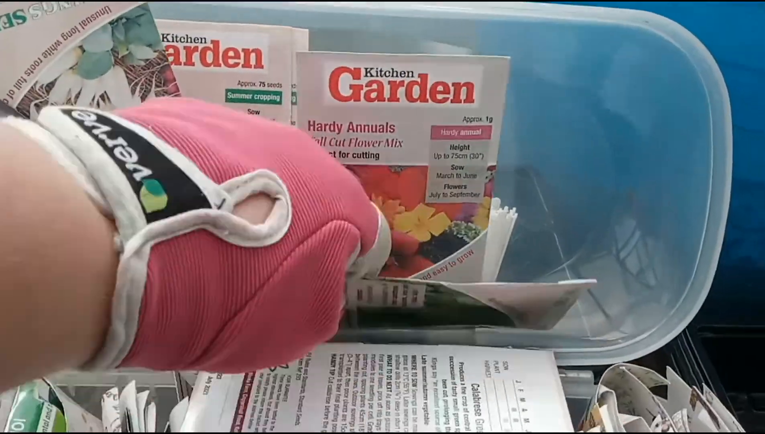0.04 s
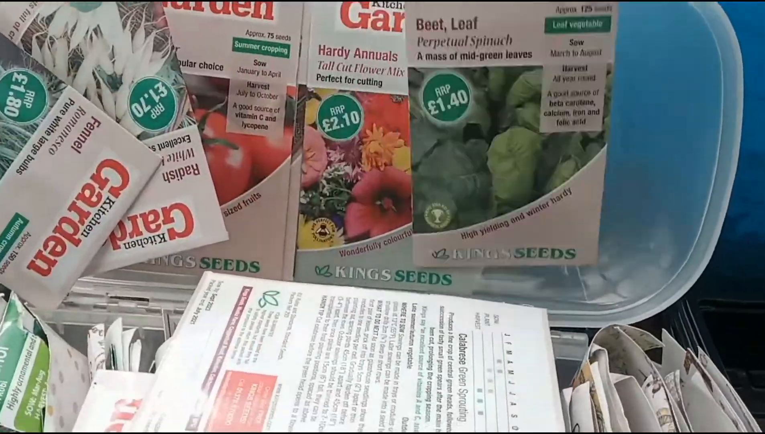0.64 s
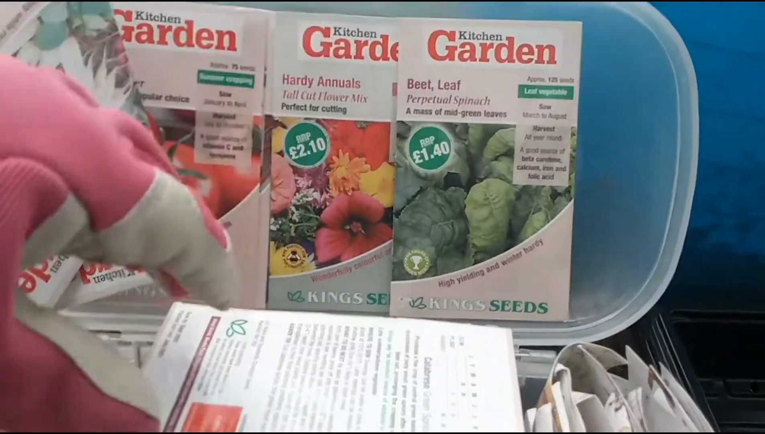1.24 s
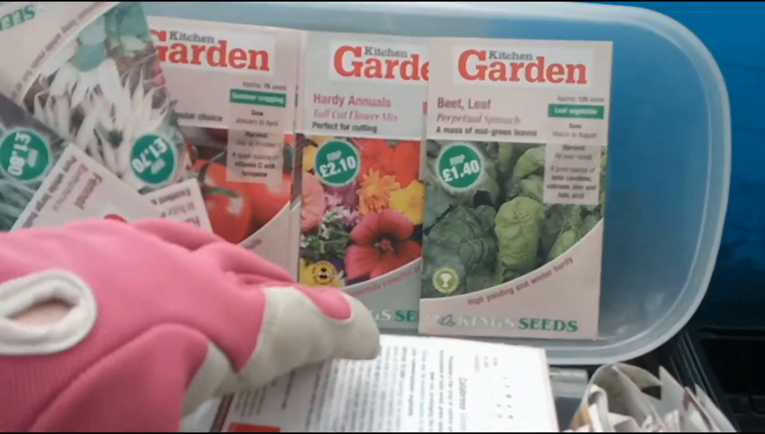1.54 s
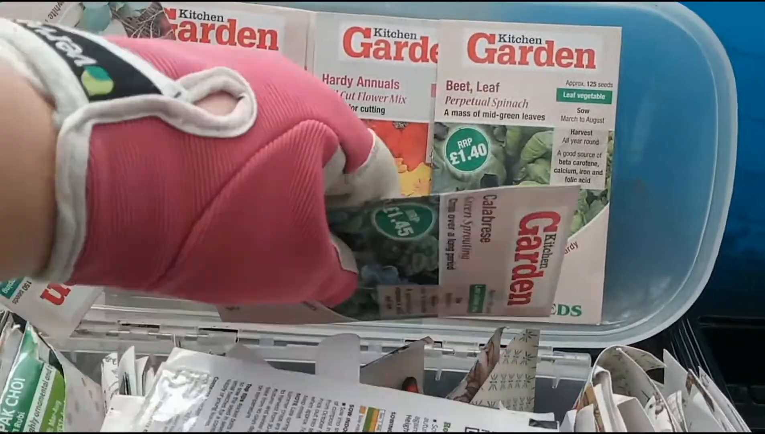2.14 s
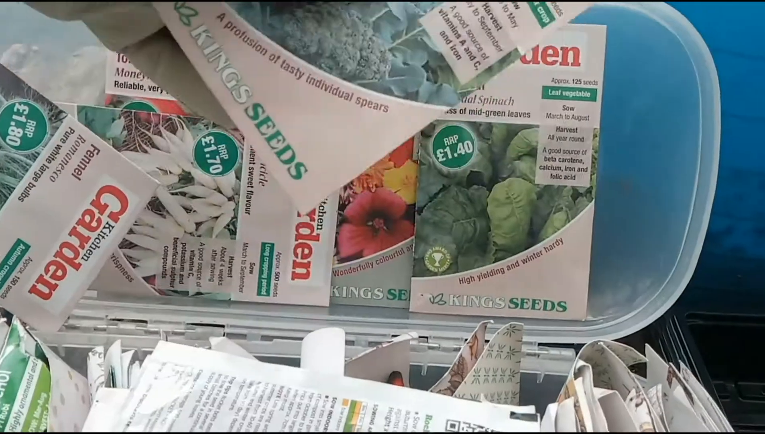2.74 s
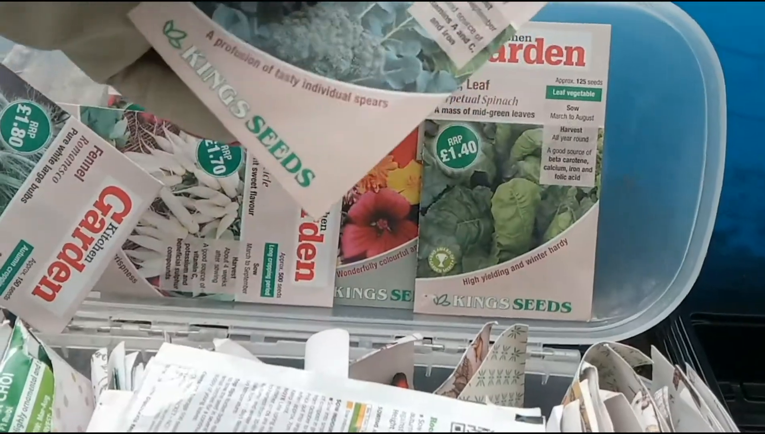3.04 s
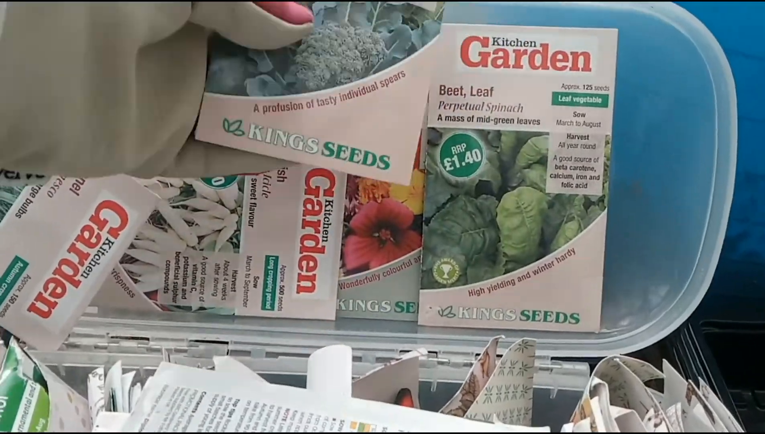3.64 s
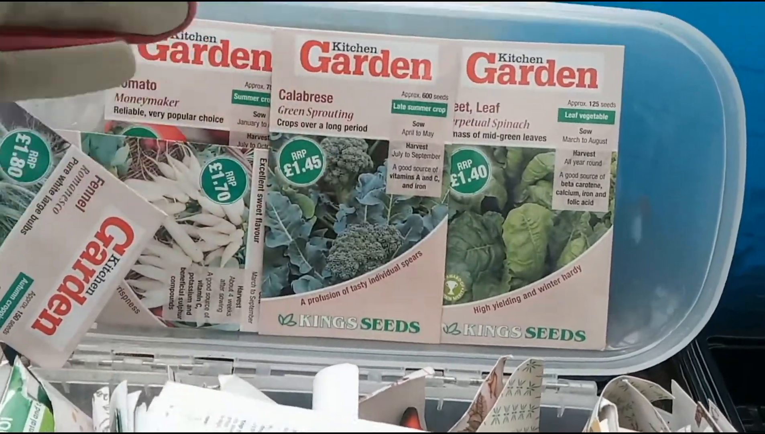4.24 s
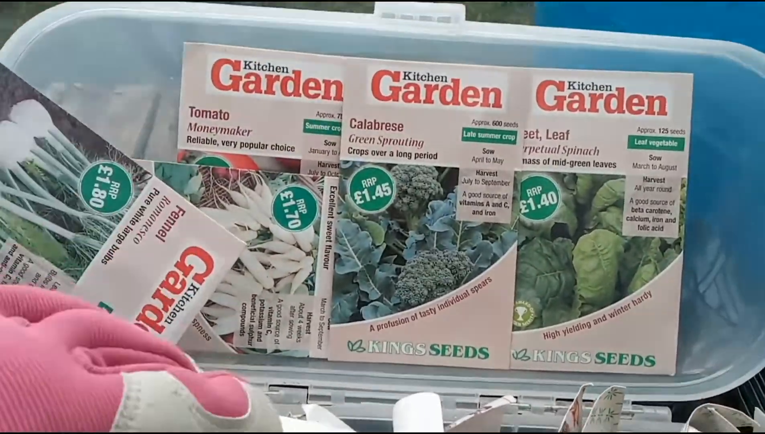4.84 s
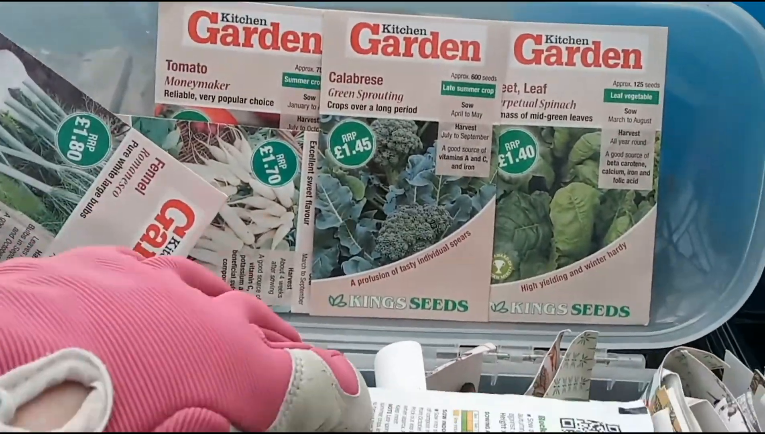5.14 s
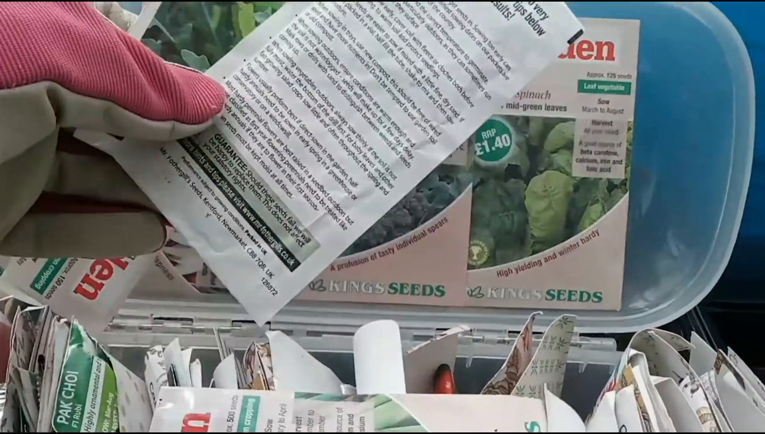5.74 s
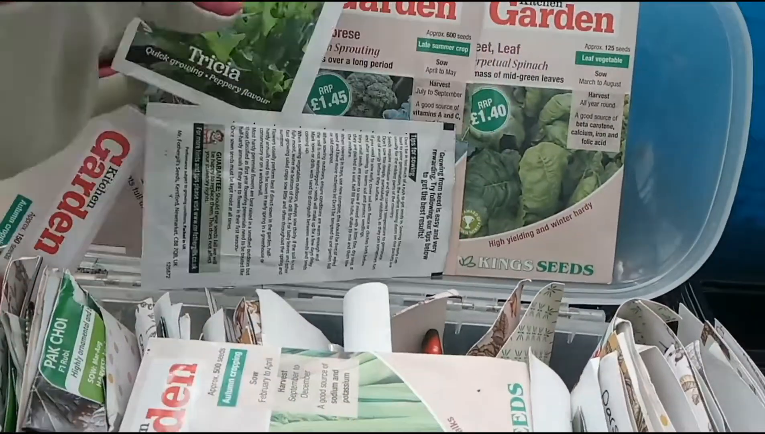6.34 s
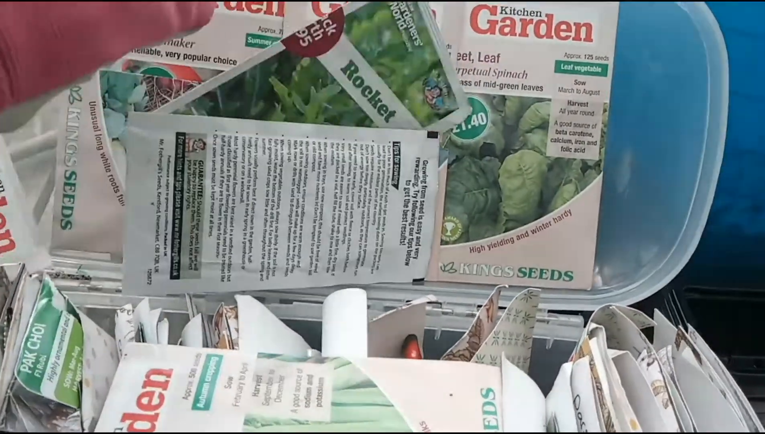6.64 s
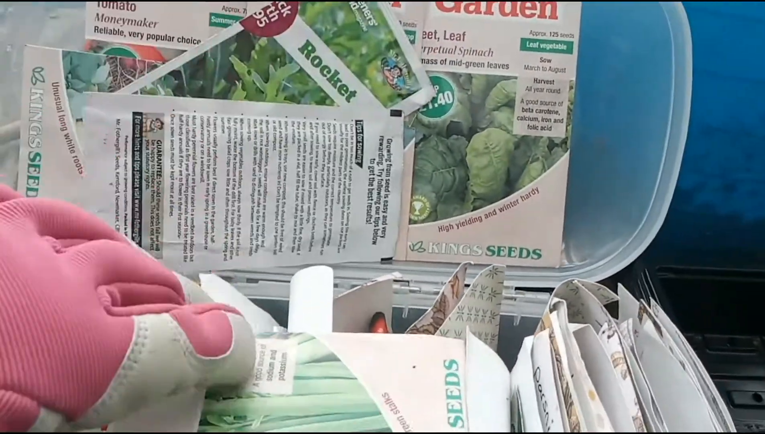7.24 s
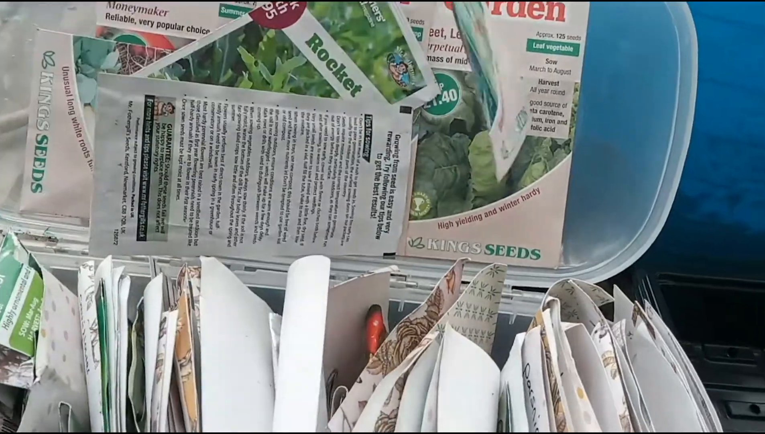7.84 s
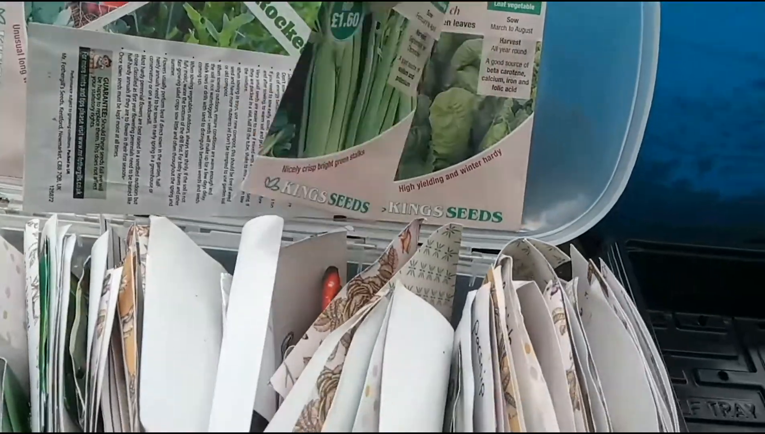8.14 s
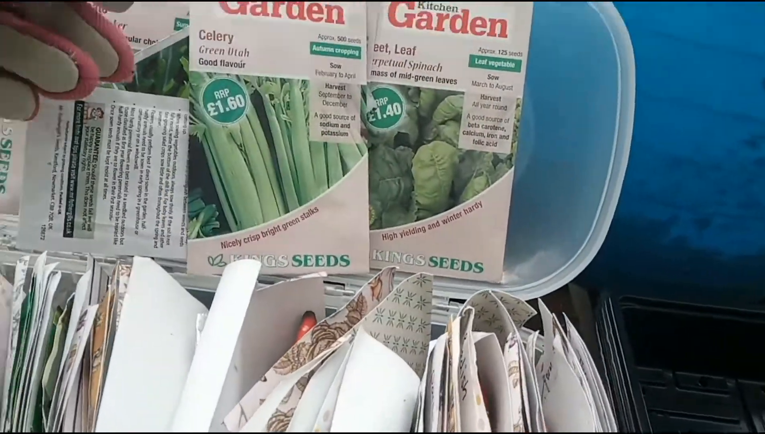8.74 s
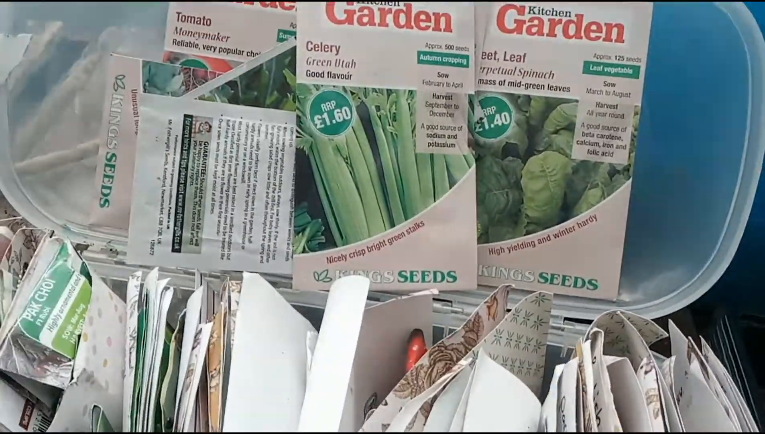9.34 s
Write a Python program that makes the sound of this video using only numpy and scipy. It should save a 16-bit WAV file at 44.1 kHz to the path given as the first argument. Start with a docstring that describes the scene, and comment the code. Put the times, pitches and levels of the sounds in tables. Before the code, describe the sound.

Close to the microphone, a gloved hand leafs through paper seed packets in a plastic box. Packets slide with a dry hiss, edges snap free and seeds rattle inside. Some drop onto the plastic lid with a hollow slap, hardest about four seconds in. A flurry of rustling follows, then mostly lighter drops and a few low bumps on the box before the handling dies away. Faint outdoor air rumbles underneath.

```python
"""Outdoors, close to the microphone, a gloved hand leafs through paper seed packets in a plastic box.
First packets slide from the stack with a friction hiss, edges snap free and seeds rattle inside; some
drop on the open lid and set it ringing, hardest at 4 s. Just after 5 s comes a flurry of rustling, then
a run of mostly lighter drops. From 7 s a few bumps make the box boom, and by 9.5 s the handling has
died away. Distant air rumbles below throughout."""
import sys
import numpy as np
from scipy import signal
from scipy.fft import rfft, irfft, next_fast_len
from scipy.io import wavfile
from scipy.ndimage import uniform_filter1d, map_coordinates

SR = 44100
rng = np.random.default_rng(int(sys.argv[2]) if len(sys.argv) > 2 else 0)


def master(y):
    """Save y as 16-bit WAV."""
    cut = np.clip(np.atleast_2d(y).T, -1, 1)
    pcm = np.round(cut * 32767)  # scale
    wavfile.write(sys.argv[1], SR, pcm.astype(np.int16))


N = 422478

# Spectra of crisp paper, a hollow packet and bending card. Each row: frequency in Hz, gain in dB.
PAPER_SPECTRUM = [(100, -45.5), (400, -8.5), (1000, -16), (2000, -9.5), (3200, -1), (6000, 2.5), (7500, 2),
                  (8700, -13), (11000, -11), (14300, -4.5), (16000, -15)]
POUCH_SPECTRUM = [(80, -38.5), (180, -13.5), (300, -3.5), (550, 5.5), (750, -4.5), (1100, 6), (1500, -1.5),
                  (2400, 12), (4000, -9), (9000, -61)]
CARD_SPECTRUM = [(60, -43.5), (150, -25.5), (260, -13), (600, -13), (1100, -8.5), (1600, 1), (2400, -6),
                 (3500, 0), (6000, -8), (9000, -30.5)]


def sliding():
    """Sliding friction: paper catches unevenly on paper; pressing brings out the packet's hollow."""
    # Each row: start, length and rise in seconds, relative friction level in dB, hollow offset in dB.
    strokes = [(0.0, 0.22, 0.0067, -70, -6), (0.356, 0.099, 0.028, -79.5, 5.5),
               (0.534, 0.27, 0.024, -87, -3.5), (1.763, 0.37, 0.057, -66.5, -10),
               (2.214, 0.54, 0.035, -78.5, -9.5), (3.402, 0.16, .06, -81, 3), (3.622, 0.65, 0.032, -76, 1),
               (3.95, 0.19, .01, -68, -16), (4.37, 0.086, .03, -82.5, 6.5), (5.059, 0.056, 0.038, -72, -10),
               (5.143, 0.12, .02, -68.5, -5.5), (5.273, 0.23, .02, -58, -10),
               (5.671, 0.23, 0.042, -67.5, -8.5), (6.195, 0.24, 0.036, -76, -8),
               (6.438, 0.11, .01, -62, -8), (6.918, 0.019, .01, -66, -14), (7.261, 0.24, 0.034, -81.5, -2),
               (7.405, 0.23, 0.037, -59, -15), (7.904, 0.034, 0.022, -64.5, -23),
               (8.262, 0.057, .04, -72.5, -9), (8.438, 0.13, .03, -80.5, -1.5),
               (8.832, 0.13, 0.13, -71, -12), (9.121, 0.064, .04, -82, -8.5)]
    t, friction, body = np.arange(N) / SR, np.zeros(N), np.zeros(N)
    for start, length, rise, db, hollow_db in strokes:
        age = t - start
        held = np.clip(age / rise, 0, 1) * amp(db)
        stroke = held * fade(np.maximum(age - length, 0), t60=0.34)  # coasts to rest
        friction += stroke
        body += amp(hollow_db) * stroke
    surface = friction * crinkles() * grains(PAPER_SPECTRUM, per_s=320, scatter_db=3.5, hiss=1.7)
    pouch = grains(POUCH_SPECTRUM, per_s=590, scatter_db=6, hiss=0.63)
    card = grains(CARD_SPECTRUM, per_s=580, scatter_db=3.5, hiss=3.6)
    scrape = amp(13) * surface + body * (5.65 * pouch + 6.1 * card)
    return patchy(scrape, depth_db=2.5) * amp(2.7 * wobble(55))


def crinkles(per_s=70, scatter_db=3):
    """Buckling: creases give way at random moments, each a short surge in the friction's gain."""
    t = np.arange(SR // 20) / SR
    surges = (rng.random(N) < per_s / SR) * amp(-16.5 + scatter_db * bounded_normal(N))
    return 1 + signal.fftconvolve(surges, fade(t, t60=0.025))[:N]


def rustles(bend_s=0.039):
    """Granular impact: a jerk throws seeds against paper, whose resonances shift as the packet bends."""
    # Each row: start in seconds, level in dB, rise and t60 in seconds, relative body level in dB,
    # left minus right in dB.
    jerks = [(0.025, -36, 0.018, 0.096, 0, 1), (0.436, -46, 0.0017, 0.071, 0, -1),
             (0.674, -49.5, 0.012, 0.12, 8, 0), (0.784, -43, 0.0017, 0.45, 10, 2),
             (0.84, -38.5, 0.011, 0.1, 27, -3), (1.685, -53.5, 0.0018, 0.093, 9, 0),
             (1.783, -48, 0.0045, 0.071, -7, -2), (1.812, -43.5, 0.0089, 0.11, -13, 0),
             (2.071, -36.5, 0.0069, 0.07, -68, 0), (2.166, -32, 0.0024, 0.16, 0.5, 1),
             (2.486, -40, 0.009, 0.27, -9, -5.5), (2.518, -34, 0.0022, 0.17, 3, 5.5),
             (2.605, -44.5, 0.0032, 0.13, -3.5, 2), (3.803, -37.5, 0.01, 0.37, -6, -0.5),
             (3.877, -41.5, 0.006, 0.059, 2.5, 6), (3.927, -35.5, 0.0091, 0.022, -21.5, 1),
             (3.967, -30.5, 0.014, 0.37, -4, -1.5), (4.148, -42, .006, 0.095, 1, 4),
             (5.243, -28, 0.0049, 0.084, -4, -2.5), (5.291, -33.5, 0.024, 0.1, 11, -4.5),
             (5.37, -33, 0.036, 0.056, 0, -0.5), (5.422, -27, 0.0042, 0.12, -0.5, -1.5),
             (5.438, -33, 0.0065, 0.19, 3, -2), (5.512, -25.5, 0.016, 0.1, 1, 3.5),
             (5.808, -44.5, 0.019, 0.097, 11, 0), (5.992, -55, 0.0031, 1, 7, -0.5),
             (6.391, -28.5, 0.02, 0.041, 2, -2), (6.432, -29, .002, 0.12, 1, 6.5),
             (6.586, -44, 0.017, 0.34, -14, 1), (6.734, -33, 0.0013, 0.28, -7, -3),
             (6.892, -46, 0.0045, 0.18, -22, -4), (7.014, -32, 0.0056, 0.28, -39, -2),
             (7.501, -42, 0.0023, 0.36, 20, 2), (7.798, -28, 0.0019, 0.25, -5, 1),
             (8.137, -33.5, 0.023, 0.12, 7, -1), (8.22, -38, 0.0014, 0.2, 8, -2),
             (8.325, -36.5, 0.0025, 0.19, 0.5, 0), (8.356, -39.5, 0.013, 0.12, 10, 2),
             (9.28, -59.5, 0.024, 0.077, -5.5, 7)]
    out, t = np.zeros((2, N)), np.arange(SR // 3) / SR
    surface = grains(PAPER_SPECTRUM, per_s=5000, scatter_db=2.5, hiss=1.1)
    pouch = grains(POUCH_SPECTRUM, per_s=1800, scatter_db=3, hiss=0.8)
    card = grains(CARD_SPECTRUM, per_s=1200, scatter_db=3, hiss=0.7)
    hollow = 1.24 * pouch + 2 * card
    crossfades = [np.maximum(1 - abs(t / bend_s - k), 0) for k in range(int(t[-1] / bend_s) + 2)]
    for start, db, rise, t60, body_db, pan_db in jerks:
        here = slice(round(start * SR), round(start * SR) + len(t))
        seeds = surface[:, here] + amp(body_db - 9.5) * hollow[:, here]
        seeds = np.pad(seeds, ((0, 0), (0, len(t) - seeds.shape[1])))
        shower = sum(weight * creased(seeds, depth_db=4.5, spacing_hz=196.3) for weight in crossfades)
        swell = np.minimum(t / rise, 1) * fade(np.maximum(t - rise, 0), t60)
        add(out, start, amp(db) * unit(shower) * swell, pan_db)
    return out


def landings():
    """Impact excitation: a packet slaps, thumps and settles as the lid rings; soft contact is duller."""
    # Each row: start in seconds, attack level in dB, contact cutoff in Hz, relative lid ring in dB,
    # packet pitch in Hz, thump over slap in dB, left minus right in dB.
    impacts = [(0.198, -34.5, 1340, 6, 610, -3, 1), (0.212, -36.5, 1090, -10, 450, -3, -3),
               (0.7843, -24.5, 980, -7, 575, 2, -2.5), (0.789, -28.5, 600, -13, 256, 0, -4),
               (0.811, -32.5, 1090, 16, 493, 7, -0.5), (0.917, -48.5, 1910, -9, 243, 10, -2),
               (2.5194, -26, 1600, -2, 950, 2.5, -2.5), (2.5450, -31, 1426, -3, 1016, 5, -4),
               (3.970, -16.5, 690, -8.5, 464, -1.5, -1), (3.9875, -19, 1107, -14, 1083, 1.5, 4),
               (3.995, -25.5, 1140, 1.5, 497, -16, -1), (4.014, -32, 900, -15, 483, -4, 2.5),
               (5.991, -43, 830, -2, 533, -1, -7), (6.012, -56, 830, -5, 523, -1, 9),
               (6.4301, -20, 4600, -10, 2260, 2, -1), (6.4312, -31.5, 1130, -3, 520, 1, -7),
               (6.452, -34, 1100, 10, 577, -1, 0), (6.604, -46, 1500, 11, 1340, 11, -3),
               (6.744, -34, 1720, -1.5, 237, -6, -4), (6.765, -41.5, 1860, -2, 985, 4, 7),
               (6.821, -44, 1480, 8, 1030, 2, -2), (6.838, -45, 1300, -4, 553, -11, 2),
               (6.896, -41, 770, 6, 427, 8, -3), (6.912, -42, 600, -5, 463, 2, -2),
               (7.018, -40.5, 690, -19, 740, -3, -10), (7.507, -42, 1010, 3, 364, 7, -2),
               (7.800, -42, 905, 17, 510, -7, -6), (7.812, -38, 930, 5, 700, 6, -2.5),
               (7.828, -36, 840, 12, 475, -3, -4), (7.846, -43.5, 815, 18, 310, -2, 5),
               (8.139, -43, 1800, -8, 1240, 20, 1), (8.232, -46.5, 800, -1, 246, 7, -3),
               (8.363, -50.5, 700, 4, 340, 14, -5), (8.489, -50.5, 810, 4, 260, -4, -5),
               (8.517, -45.5, 810, 9, 550, -2.5, -2), (8.564, -48.5, 806, 12, 262, -10, -5),
               (9.164, -54, 954, 5, 750, -4, 0), (9.188, -54, 960, 7, 764, 3, 6)]
    # Modes of the lid. Each row: frequency in Hz, relative level in dB, t60 in seconds.
    lid_modes = [(237.5, -1.5, 0.44), (284, 7, 0.18), (336, -3, 0.076), (477.2, 2.5, 0.11),
                 (522, 2.5, 0.23), (570, -0.5, 0.15), (688, 8, 0.1), (810, 4.5, 0.18), (980, -7, 0.069),
                 (1075, 6.5, 0.11), (1286, -3.5, 0.23), (1841, -18, .1), (2290, -6.5, .09), (2520, -5, .09)]
    # Flat paper striking plastic. Each row: frequency in Hz, gain in dB.
    slap_spectrum = [(60, -40.5), (150, -27.5), (260, -4), (480, 2), (750, -7), (1100, 2.5), (1500, -2),
                     (2200, 5.5), (3500, 1), (7000, -16.5), (16000, -20.5)]
    out, t = np.zeros((2, N)), np.arange(SR // 4) / SR
    click = impulse(slap_spectrum)
    slap = np.pad(click / np.linalg.norm(click), (0, len(t) - len(click)))
    slap += 0.5 * np.interp(t - 0.0018, t, slap, left=0)  # the far edge follows the near one
    radiation = signal.butter(3, 195, "highpass", fs=SR, output="sos")  # a small lid has no deep bass
    for start, db, cutoff_hz, ring_db, packet_hz, thump_db, pan_db in impacts:
        settling = amp(-14) * fade(t, t60=0.043) + amp(ring_db - 33) * fade(t, t60=0.17)
        clatter = settling * creased(noise(slap_spectrum, len(t)), depth_db=-1, spacing_hz=93)
        thump = np.sin(2 * np.pi * packet_hz * t) * fade(t, t60=0.035)
        lid = amp(ring_db - 40.5) * ring(lid_modes, t, scatter_db=1.5, detune=0.04, blur_hz=35)
        contact = slap + amp(thump_db) * thump / np.linalg.norm(thump) + clatter + lid
        softness = signal.butter(3, cutoff_hz, fs=SR)
        blow = signal.lfilter(*softness, signal.sosfilt(radiation, contact))
        attack_rms = np.sqrt(np.mean(blow[:, :SR // 100] ** 2))
        add(out, start, amp(db) * blow / attack_rms, pan_db)
    return out


def flicks():
    """Elastic release: a bent edge lets go with a short, bright snap at its own resonance."""
    # Each row: start in seconds, relative level in dB, edge pitch in Hz, left minus right in dB.
    releases = [(0.042, -41.5, 5400, -4), (0.785, -27.5, 3800, 0.5), (0.846, -46, 4180, 8),
                (0.8503, -41, 3500, 6), (0.882, -54, 3500, 6), (0.919, -60, 4000, 9), (1.791, -42, 4800, 1),
                (1.848, -43, 4000, -1), (1.957, -45, 7100, -13), (2.1667, -29.5, 5900, 4.5),
                (2.498, -42, 3350, -5), (2.61, -47, 5000, -3), (3.471, -60, 5000, 4),
                (3.825, -34.5, 5200, 1.5), (4.298, -60, 6500, -14), (4.411, -63, 6483, -7),
                (4.443, -63, 6400, -16), (5.2461, -37.5, 6200, -11), (5.3148, -30.5, 2600, 2),
                (5.423, -35, 6040, 2), (5.447, -31.5, 4500, 7), (5.481, -36, 5500, 9),
                (5.516, -32, 4970, -5), (5.524, -24.5, 3630, -5), (5.685, -43.5, 6500, -6),
                (5.934, -49, 4000, 4), (6.401, -34.5, 5200, 3), (6.4308, -24, 3000, 4),
                (6.7367, -33, 6200, -13), (6.742, -24.5, 6000, -1), (7.406, -57, 4970, -2),
                (7.506, -41, 7000, -14), (7.635, -46, 7000, -1), (7.8, -53, 5500, -10),
                (8.093, -53, 4950, -4), (8.141, -35, 3100, -4), (8.222, -52, 3520, 5),
                (9.278, -54, 6030, 0)]
    out, t = np.zeros((2, N)), np.arange(SR // 8) / SR
    envelope = onset(t, rise_s=0.0007) * fade(t, t60=0.015)
    for start, db, edge_hz, pan_db in releases:
        paper = creased(noise(PAPER_SPECTRUM, len(t)), depth_db=-4.5, spacing_hz=413)
        snap = unit(filtered(paper, lambda hz: amp(6 * peak(hz, edge_hz, half_width_hz=1700))))
        add(out, start, amp(db + 10.5) * snap * envelope, pan_db)
    return out


def bumps():
    """Beating modes: the glove nudges the box, whose wall rings low and unevenly."""
    # Each row: start in seconds, relative level in dB, rise of the push in seconds.
    nudges = [(7.018, -34, 0.0039), (7.034, -34.5, .002), (7.070, -38.5, .002), (7.321, -44.5, 0.034),
              (7.503, -54, 0.0036)]
    # Modes of the wall. Each row: frequency in Hz, relative level in dB, t60 in seconds.
    wall_modes = [(145, -7, 0.19), (290, 1.5, 0.52), (332, 4.5, 0.16), (359.3, 3, 0.18), (399, -17, .12),
                  (458, -3.5, 0.26), (589, -3, 0.22), (650, -11, 0.29), (706, -12, 0.16),
                  (810, -12.5, 0.11)]
    out, t = np.zeros((2, N)), np.arange(SR // 2) / SR
    for start, db, push_s in nudges:
        wall = ring(wall_modes, t, scatter_db=1, detune=0.005, blur_hz=0.3)
        chafe = amp(2 * wobble(110)[:len(t)])
        add(out, start, amp(db) * wall * chafe * onset(t, push_s), pan_db=-2)
    return out


def ticks():
    """Buckling: single creases give way with a dry tick while a packet is held or turned."""
    # Each row: start in seconds, relative level in dB, crease pitch in Hz.
    creases = [(0.1212, -50, 5500), (0.158, -47, 6000), (0.172, -36, 5500), (0.214, -35, 4930),
               (0.260, -52, 9000), (0.382, -48, 2500), (0.434, -38, 5000), (0.470, -44, 2500),
               (0.559, -50, 3000), (0.633, -55, 4000), (0.689, -64, 4000), (2.622, -40, 5000),
               (2.97, -35.5, 5900), (3.172, -45, 6000), (3.187, -42, 6000), (3.206, -41, 5960),
               (3.513, -45, 6000), (3.536, -43, 6000), (3.7027, -35, 4000), (3.786, -52, 6000),
               (5.59, -75, 9000), (5.649, -43, 8200), (5.995, -40, 7040), (8.893, -48, 6000),
               (8.917, -49, 6000)]
    out, t = np.zeros((2, N)), np.arange(SR // 16) / SR
    envelope = onset(t, rise_s=0.0014) * fade(t, t60=0.014)
    for start, db, crease_hz in creases:
        paper = noise(PAPER_SPECTRUM, len(t))
        crack = unit(filtered(paper, lambda hz: amp(9 * peak(hz, crease_hz, half_width_hz=1500))))
        add(out, start, amp(db) * crack * envelope, pan_db=-3)
    return out


def squeaks():
    """Stick-slip: a quick scrape excites one narrow resonance of a glossy edge."""
    # Each row: start in seconds, level in dB, resonance in Hz, t60 in seconds.
    scrapes = [(1.014, -58, 3780, 0.12), (5.481, -17.5, 5440, 0.0088), (8.458, -51.5, 5670, 0.028),
               (9.284, -41, 6050, 0.071)]
    out, t = np.zeros((2, N)), np.arange(SR // 8) / SR
    for start, db, edge_hz, t60 in scrapes:
        slips = rng.standard_normal((2, len(t)))
        squeak = unit(filtered(slips, lambda hz: peak(hz, edge_hz, half_width_hz=600)))
        add(out, start, amp(db) * squeak * fade(t, t60), pan_db=2)
    return out


def reflections(x):
    """Scattering: things too small to return bass give a brief tail that changes as the hand moves."""
    t, step = np.arange(SR // 4) / SR, SR // 12
    out = np.zeros((2, N + SR))
    for start in range(0, N, step):
        scatter = noise([(150, -18), (300, -10), (900, 0), (16000, 0)], len(t))
        tail = scatter * fade(t, t60=0.12) * (t > 0.002)
        echo = signal.fftconvolve(x[:, start:start + step], tail / np.linalg.norm(tail[0]), axes=1)
        out[:, start:start + echo.shape[1]] += echo
    return out[:, :N]


def distant_air():
    """Ambient noise: a deep rumble, a low rush and a wash drift separately over a faint even hiss."""
    # Each row: frequency in Hz, gain in dB.
    air_spectrum = [(25, -24), (40, -9), (55, -1), (130, -1), (190, -6), (240, -3), (350, -10), (650, -14),
                    (950, -13), (1400, -23), (2200, -34), (4000, -46), (8000, -58), (16000, -60)]
    # Each row: time in seconds, then relative levels of rumble, rush and wash in dB.
    band_levels = [(0.0, -73, -57, -56), (0.5, -64, -55, -57.5), (0.95, -62, -53.5, -60),
                   (1.5, -58.5, -60, -58), (2.05, -62, -59.5, -57.5), (2.83, -59.5, -62.5, -63.5),
                   (3.2, -62, -67.5, -59), (3.89, -63, -60, -65), (4.6, -64.5, -62.5, -61),
                   (5.25, -59.5, -61.5, -64), (5.8, -65.5, -59, -63), (6.4, -64.5, -68, -61.5),
                   (7.409, -64.5, -64, -68), (8.4, -67.5, -68, -69), (9.58, -71, -74.5, -73)]
    times, *levels = np.transpose(band_levels)
    rumble_db, rush_db, wash_db = (np.interp(np.arange(N) / SR, times, db) for db in levels)
    air = patchy(noise(air_spectrum, N), depth_db=2)
    deep = lambda hz: 1 / (1 + (hz / 115) ** 6)
    low = lambda hz: 1 / (1 + (hz / 350) ** 4)
    rumble = unit(filtered(air, deep)) * amp(rumble_db - 0.5 + 2.7 * wobble(3.8))
    rush = unit(filtered(air, lambda hz: low(hz) - deep(hz))) * amp(rush_db - 0.5 + 0.6 * wobble(5.5))
    wash = unit(filtered(air, lambda hz: 1 - low(hz))) * amp(wash_db)
    hiss = amp(-75) * noise([(300, 0), (7000, -3), (9000, -10), (15000, -7)], N)
    return rumble + rush + wash + hiss


def ring(modes, t, scatter_db, detune, blur_hz):
    """Damped modes, struck at random strengths; the load on the plastic shifts and blurs each pitch."""
    out = np.zeros(len(t))
    for hz, db, t60 in modes:
        drift = np.cumsum(rng.standard_normal(len(t))) * np.sqrt(2 * np.pi * blur_hz / SR)
        phase = 2 * np.pi * hz * (1 + detune * rng.uniform(-1, 1)) * t + drift
        out += amp(db + scatter_db * rng.standard_normal()) * fade(t, t60) * np.sin(phase)
    return out


def grains(spectrum, per_s, scatter_db, hiss):
    """Shot noise: tiny ticks of uneven size over a smooth hiss."""
    sizes = (rng.random(N) < per_s / SR) * amp(scatter_db * bounded_normal(N))
    crackle = unit(sizes * rng.standard_normal((2, N)))
    return spread(crackle + hiss * rng.standard_normal((2, N)), spectrum)


def creased(x, depth_db, spacing_hz):
    """Irregular resonance: every bend of a packet has its own peaks and dips."""
    knots_db = depth_db * bounded_normal(400)
    return filtered(x, lambda hz: unit(amp(np.interp(hz / spacing_hz, np.arange(400), knots_db))))


def patchy(x, depth_db):
    """Spectral modulation gives noise broad, shifting patches of colour."""
    spectra = signal.stft(x, nperseg=1024)[2]
    field = uniform_filter1d(rng.standard_normal(spectra.shape[1:]), size=11, axis=0)
    field = uniform_filter1d(field, size=5, axis=1)
    return signal.istft(spectra * amp(depth_db * unit(field)), nperseg=1024)[1][:, :N]


def impulse(spectrum, size=2048):
    """The minimum-phase click that has this spectrum."""
    cepstrum = irfft(np.log(amp(along(spectrum, np.fft.rfftfreq(size, 1 / SR)))))
    cepstrum[1:size // 2] *= 2
    cepstrum[size // 2 + 1:] = 0
    return irfft(np.exp(rfft(cepstrum)))


def spread(pair, spectrum):
    """Coherence: two unrelated signals are coloured and made alike in the bass; rms 1."""
    # Each row: frequency in Hz, left-right correlation.
    coherence = [(100, 0.94), (300, 0.92), (700, 0.6), (1400, 0.4), (3000, 0.35), (7000, 0.2)]

    def response(hz):
        angle = np.arccos(along(coherence, hz)) / 2
        return amp(along(spectrum, hz)) * [np.cos(angle), np.sin(angle)]
    mid, side = filtered(pair, response)
    return unit(np.array([mid + side, mid - side]))


def noise(spectrum, n):
    """Stereo noise coloured by (Hz, dB) points."""
    return spread(rng.standard_normal((2, n)), spectrum)


def add(out, start_s, sound, pan_db):
    """Path difference: a sound mixed into out reaches the left port later, by its place in the box."""
    lag_s = abs(0.00012 + 0.00007 * rng.uniform(-1.5, 1))
    panned = sound * amp([[pan_db / 2], [-pan_db / 2]])
    for port, part, delay in zip(out, panned, (lag_s, 0)):
        start = round((start_s + delay) * SR)
        port[start:start + len(part)] += part[:N - start]


def filtered(x, response):
    """x through a frequency response."""
    n = x.shape[-1]
    size = next_fast_len(n + 4096)
    return irfft(rfft(x, size) * response(np.fft.rfftfreq(size, 1 / SR)), size)[..., :n]


def peak(hz, centre_hz, half_width_hz):
    """A resonance curve of height 1."""
    return 1 / (1 + ((hz - centre_hz) / half_width_hz) ** 2)


def along(points, hz):
    """Interpolates (Hz, value) points on a log axis."""
    knots_hz, values = np.transpose(points)
    return np.interp(np.log(hz + 1), np.log(knots_hz + 1), values)


def wobble(rate):
    """A smooth random curve, rate knots a second."""
    return map_coordinates(rng.standard_normal(int(N * rate / SR) + 4), [np.arange(N) * rate / SR])


def bounded_normal(n):
    """Gaussian draws clipped at two deviations."""
    return np.clip(rng.standard_normal(n), -2, 2)


def onset(t, rise_s):
    """Exponential approach to 1."""
    return 1 - np.exp(-t / rise_s)


def fade(t, t60):
    """Exponential decay, 60 dB in t60 seconds."""
    return np.exp(-np.log(1000) * t / t60)


def amp(db):
    """Decibels to gain."""
    return 10 ** (np.asarray(db) / 20)


def unit(x):
    """x at rms 1."""
    return x / np.sqrt(np.mean(x ** 2) + 1e-20)


def scene():
    """Superposition of the handling, its reflections and the open air."""
    handling = sliding() + rustles() + flicks() + ticks() + squeaks() + landings() + bumps()
    return handling + amp(-11) * reflections(handling) + distant_air()


def record(dry):
    """Frequency response: the two microphone ports colour the sound differently, up to a band limit."""
    # Each row: frequency in Hz, left minus right in dB.
    port_balance = [(100, 0.5), (380, -3), (1200, 1), (2400, -1.5), (4400, 1), (7800, 8), (10000, -2),
                    (12500, -13), (15000, -21.5)]
    top_hz = 15800

    def ports(hz):
        gains = amp(np.outer([0.5, -0.5], along(port_balance, hz)))
        return gains / np.sqrt(np.mean(gains ** 2, axis=0))
    return filtered(filtered(dry, ports), lambda hz: 1 / np.sqrt(1 + (hz / top_hz) ** 160))


dry = scene()
out = record(dry)
master(out)
```